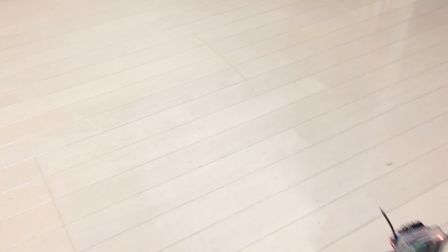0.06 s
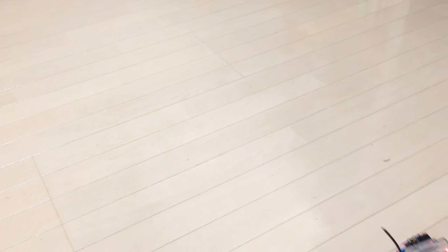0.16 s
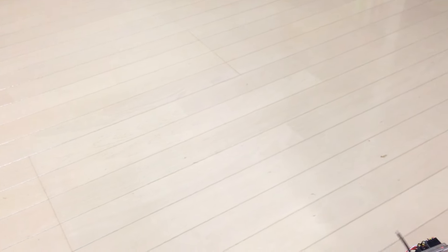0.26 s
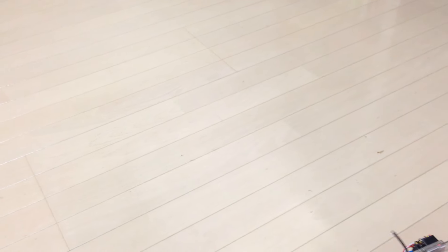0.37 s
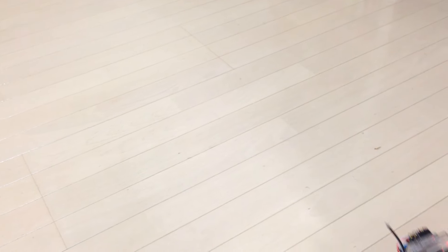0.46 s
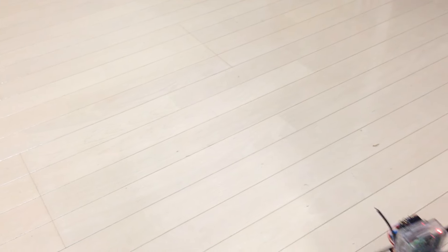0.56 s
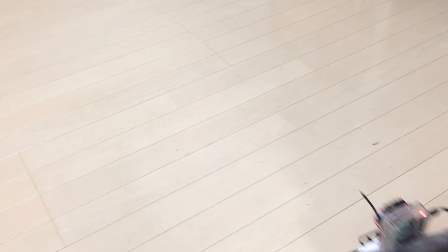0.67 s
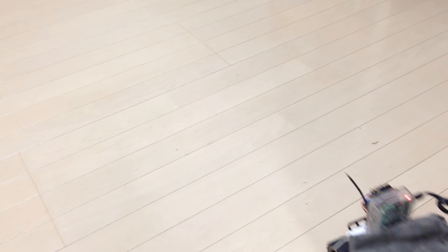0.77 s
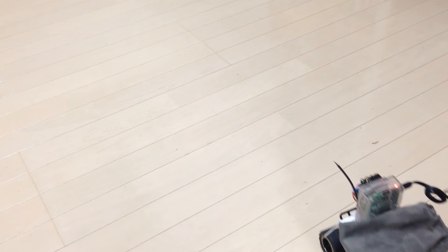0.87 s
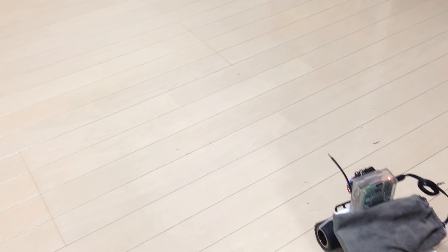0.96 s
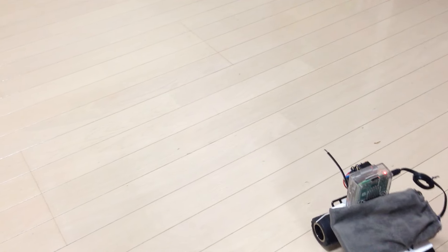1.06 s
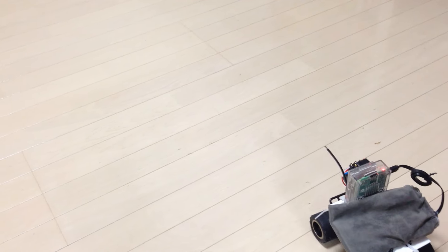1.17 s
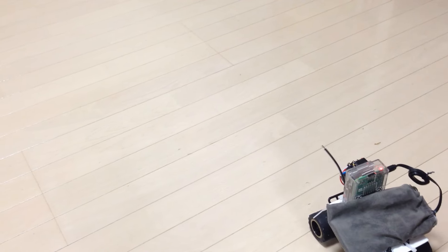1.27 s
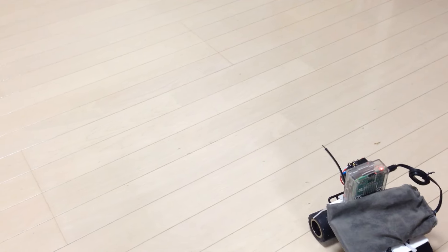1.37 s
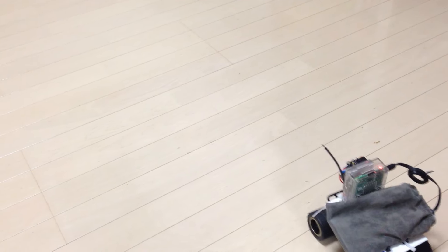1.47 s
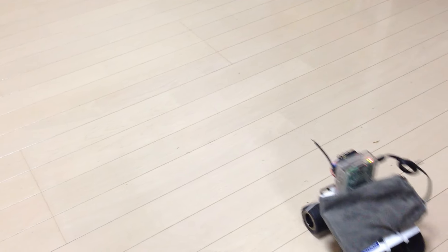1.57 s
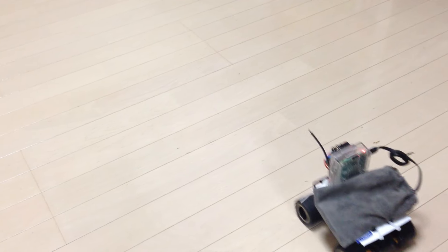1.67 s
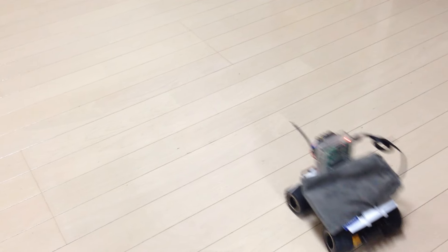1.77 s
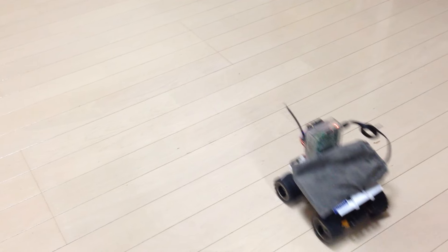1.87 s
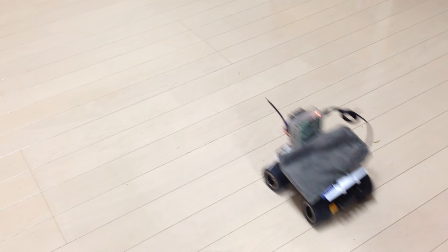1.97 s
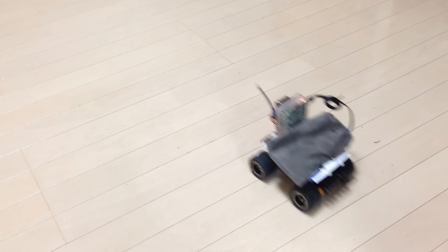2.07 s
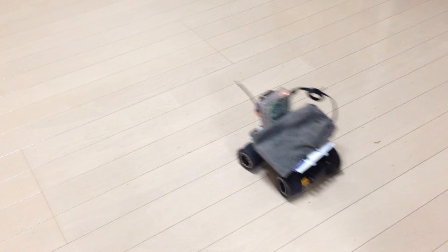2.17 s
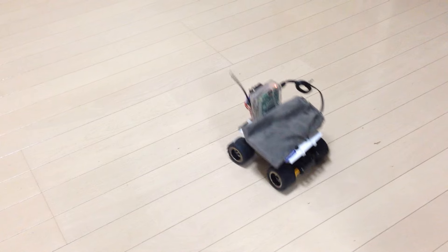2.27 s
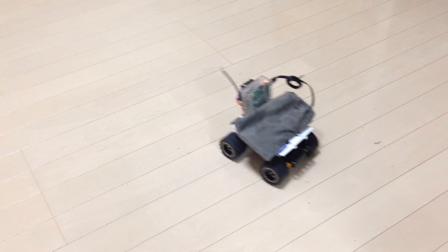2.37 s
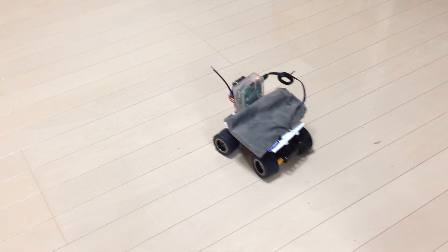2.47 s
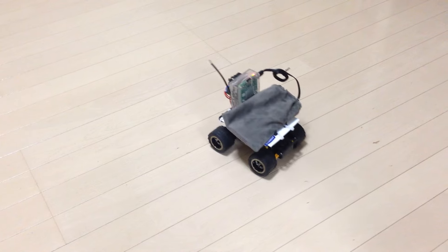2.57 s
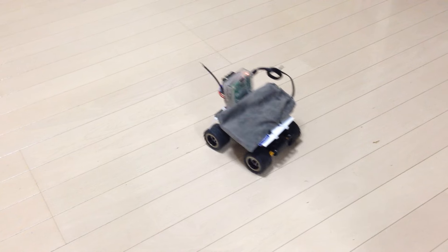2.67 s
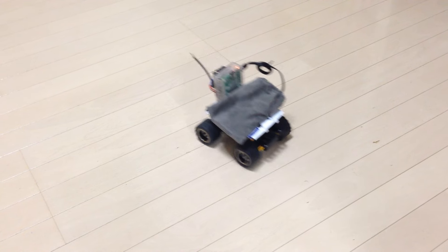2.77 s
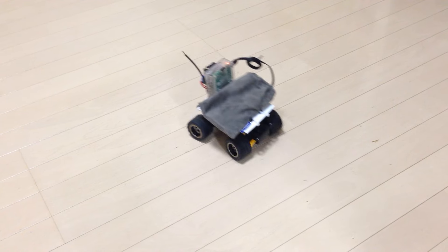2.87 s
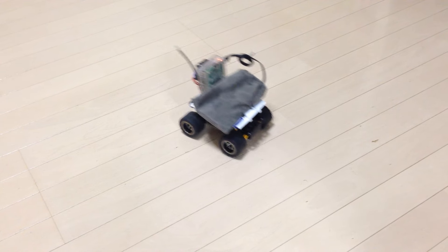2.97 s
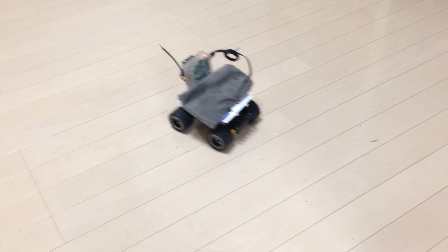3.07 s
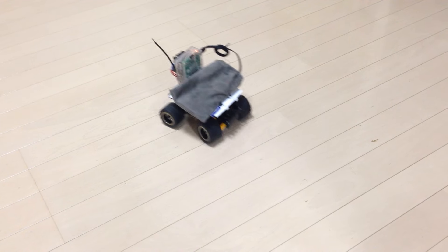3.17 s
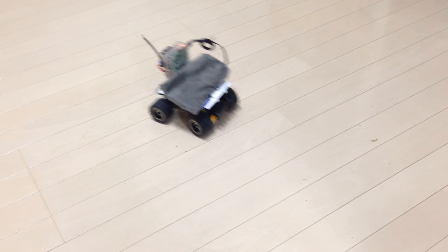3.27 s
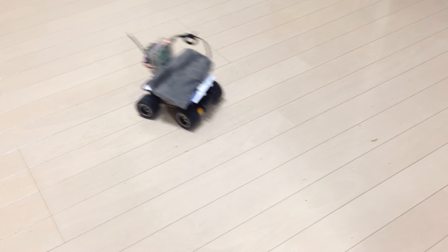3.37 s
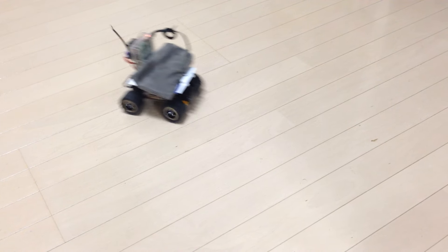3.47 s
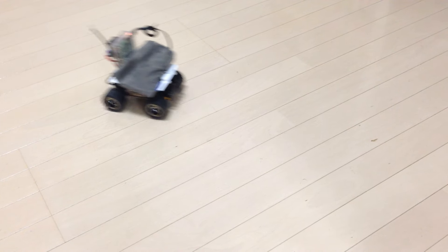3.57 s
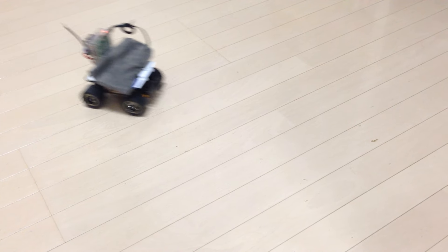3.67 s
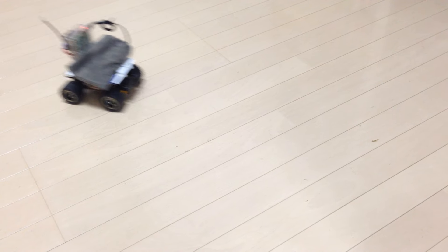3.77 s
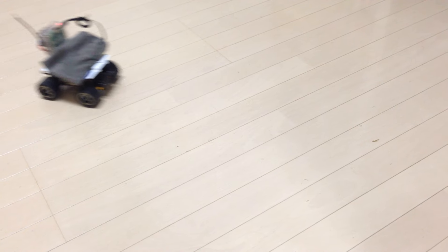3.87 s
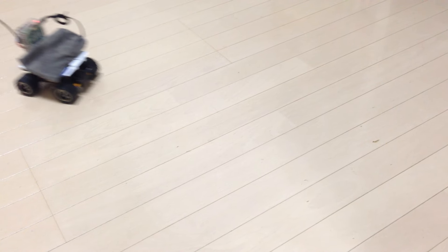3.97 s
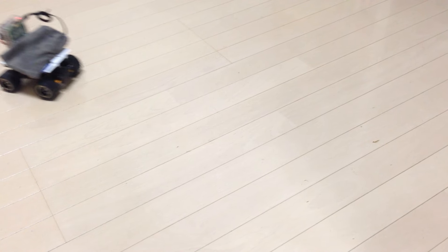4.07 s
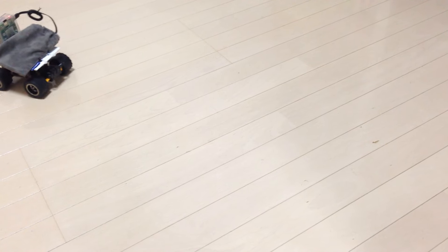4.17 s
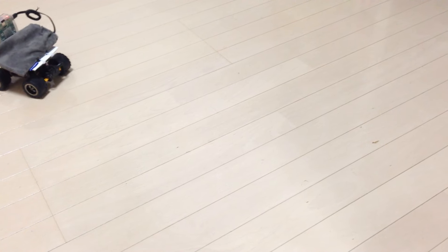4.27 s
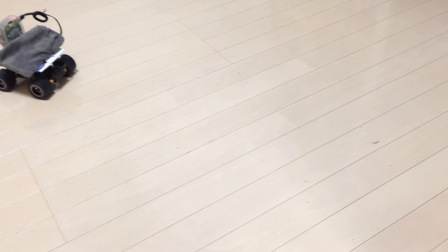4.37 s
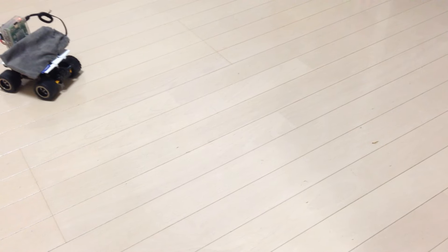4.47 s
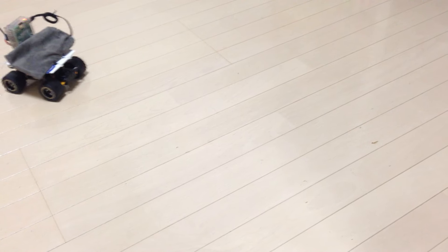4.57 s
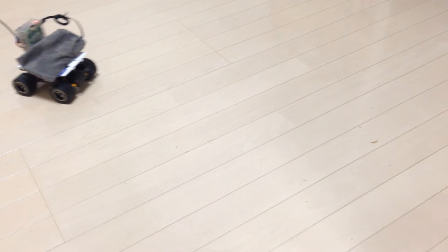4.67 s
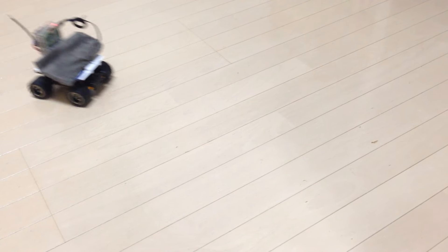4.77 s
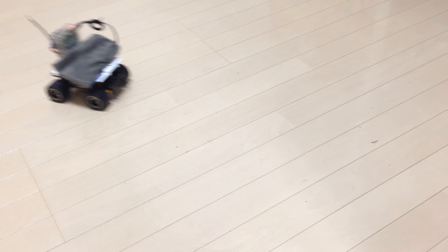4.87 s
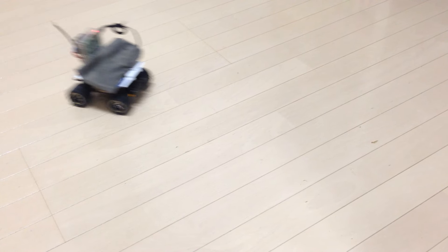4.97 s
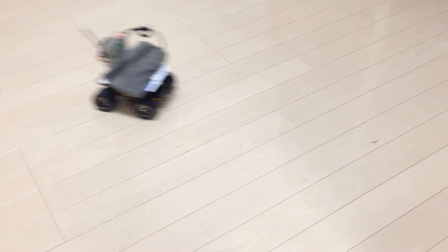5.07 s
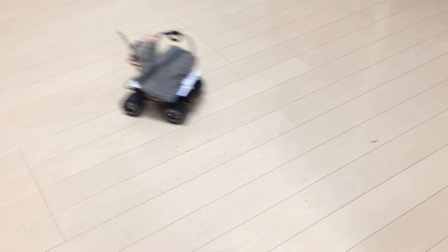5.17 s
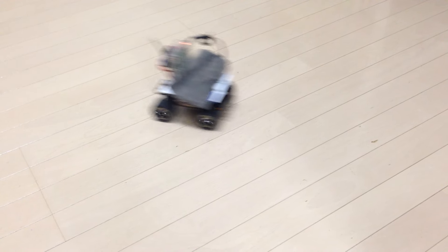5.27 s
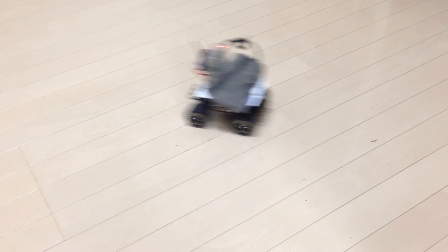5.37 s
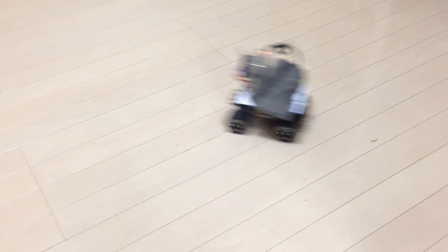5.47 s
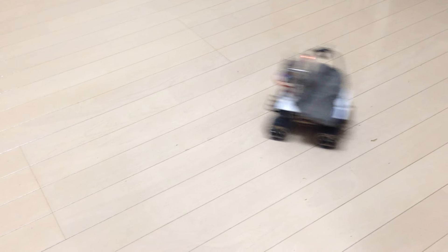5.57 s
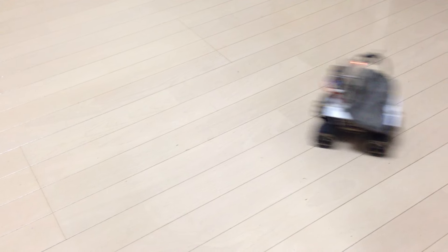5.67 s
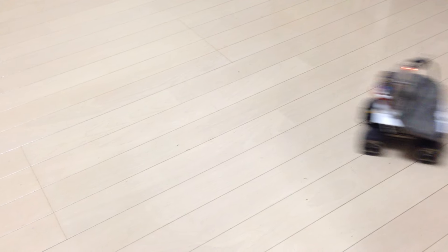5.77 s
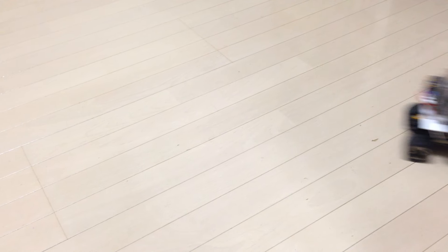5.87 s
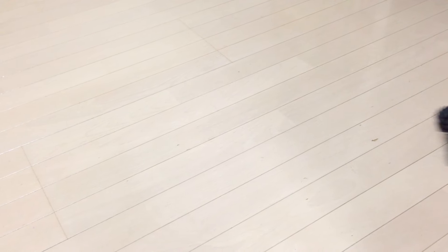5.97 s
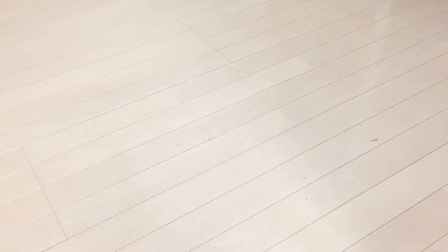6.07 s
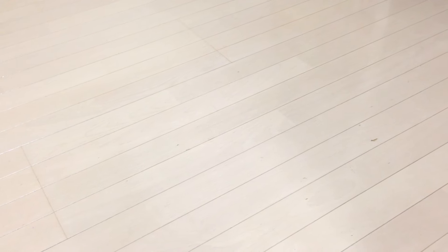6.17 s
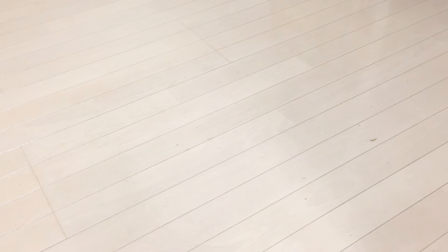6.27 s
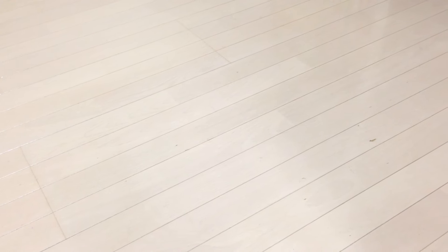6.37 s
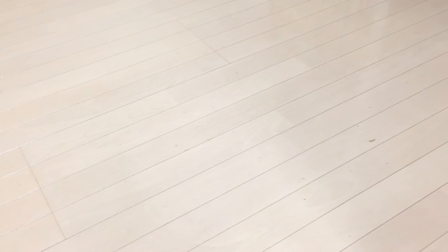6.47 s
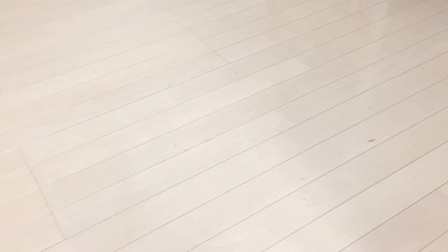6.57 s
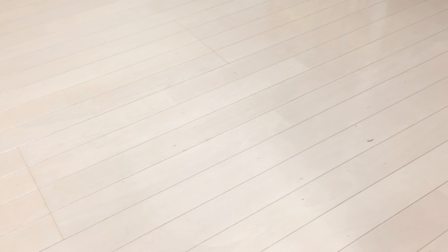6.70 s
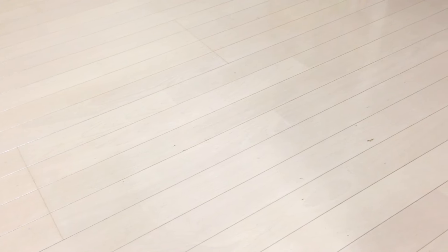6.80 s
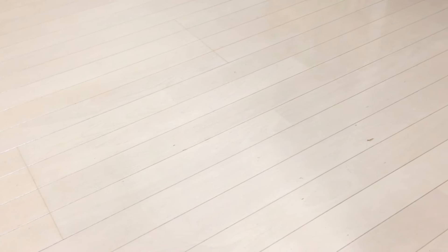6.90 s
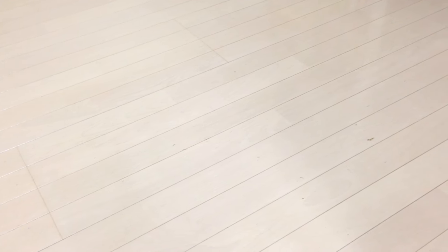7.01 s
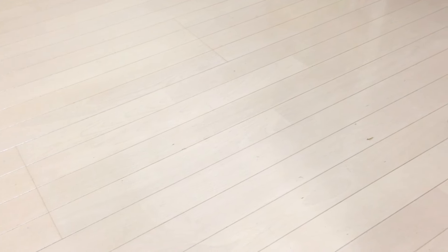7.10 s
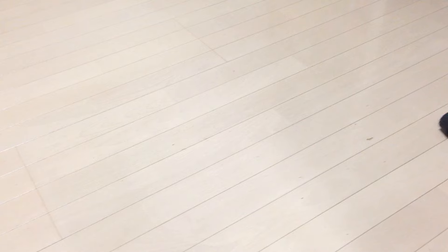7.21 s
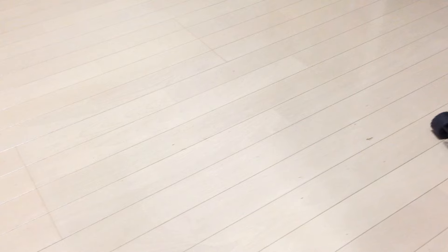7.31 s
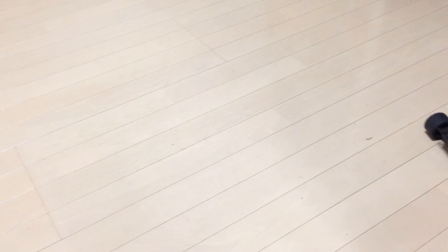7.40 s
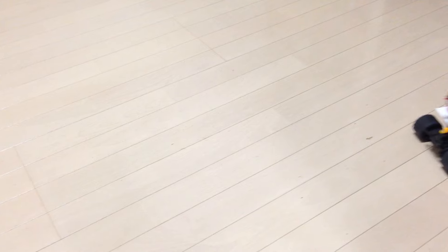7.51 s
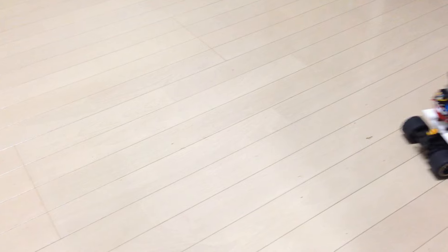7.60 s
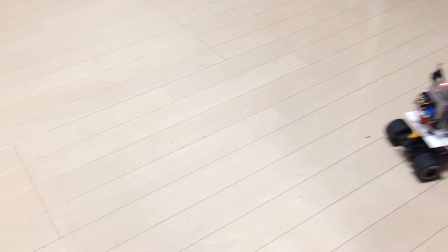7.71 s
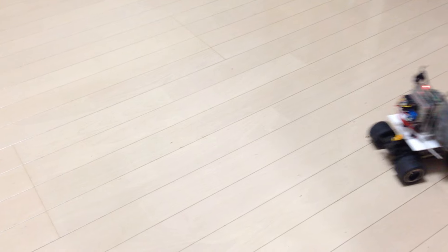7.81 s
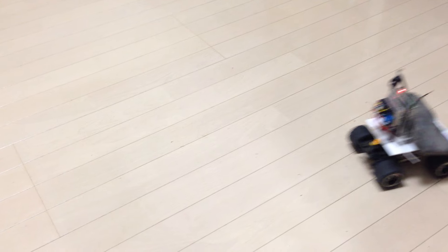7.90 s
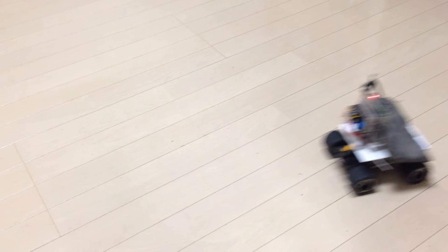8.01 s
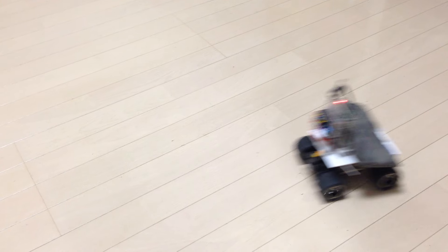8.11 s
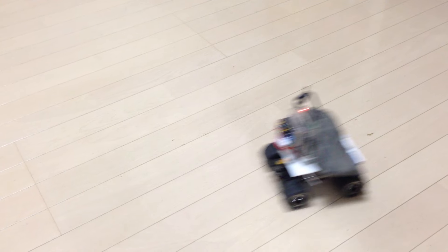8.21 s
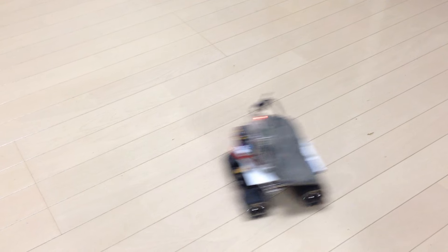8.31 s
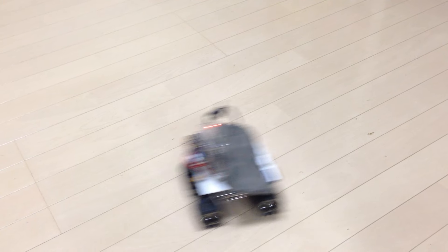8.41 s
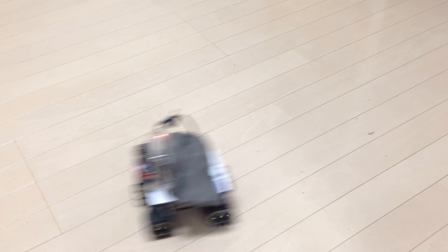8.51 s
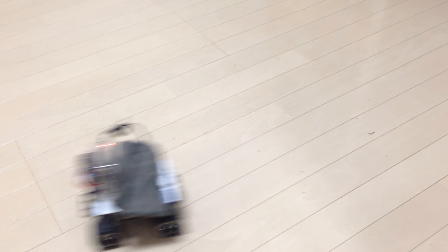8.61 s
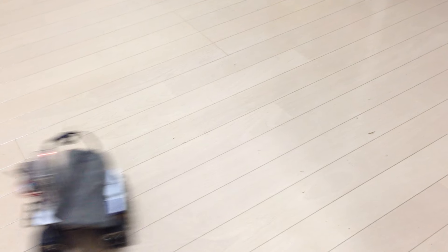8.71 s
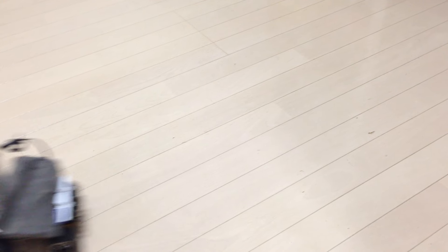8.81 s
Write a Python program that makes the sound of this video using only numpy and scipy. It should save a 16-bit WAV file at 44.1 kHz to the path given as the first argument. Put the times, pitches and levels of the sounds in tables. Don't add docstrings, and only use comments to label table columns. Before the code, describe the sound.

Stop-and-go plastic gear whirr, tyre drumming and dry clicks from a little motorised car on floorboards, close up in a quiet room.

```python
import sys
import numpy as np
from scipy import signal
from scipy.fft import rfft, irfft, next_fast_len
from scipy.io import wavfile
from scipy.ndimage import uniform_filter1d

SR = 44100
rng = np.random.default_rng(int(sys.argv[2]) if len(sys.argv) > 2 else 0)


def how_loud(loudness_db):
    steps = np.asarray(loudness_db, float) / 20
    return 10 ** steps


def inscribe(sig):
    pcm = np.round(np.clip(np.atleast_2d(sig).T, -1, 1) * 32767)
    wavfile.write(sys.argv[1], SR, pcm.astype(np.int16))


N = 390285

# [frame/dB, gearbox/dB, shell/dB, brushes/dB, loose board/dB]
GAIT_BALANCE = [
    (-3, -1.5, -0.5, -3, 1.5),
    (-3, -4, -5.5, -9, 3),
    (-10, -7.5, -4.5, -9.5, 2.5),
    (-10.5, -8, -5.5, -9, -1),
]


def evened(x):
    return x / np.sqrt(np.mean(x ** 2) + 1e-20)


def curves(rows):
    s, *columns = np.transpose(rows)
    return [np.interp(np.arange(N) / SR, s, c) for c in columns]


def add(mix, s, sound):
    part = mix[max(round(s * SR), 0):][:len(sound)]
    part += sound[:len(part)]


def summed(db):
    return 10 * np.log10((how_loud(db) ** 2).sum(0))


def drift(per_s):
    knots = np.arange(0, N / SR + .1, .2 / per_s)
    smooth = uniform_filter1d(rng.standard_normal(len(knots)), size=5)
    smooth = uniform_filter1d(smooth, size=5)
    return np.interp(np.arange(N) / SR, knots, evened(smooth))


def coloured(x, points):
    f, db = np.transpose(points)
    size = next_fast_len(N)
    hz = np.fft.rfftfreq(size, 1 / SR)
    gain = how_loud(np.interp(np.log(hz + 1), np.log(f + 1), db))
    return evened(irfft(rfft(x, size) * gain, size)[:N])


def still_air():
    # [f/Hz, level/dB per Hz]
    air_spectrum = [(18, -32), (48, -6.5), (72, 0), (130, -8.5), (225, -16), (292, -6.5), (341, -16),
                    (443, -13), (945, -24.5), (2300, -23), (2750, -23.5), (3400, -21), (5000, -25),
                    (14300, -27), (15500, -23.5)]
    return how_loud(-60) * coloured(rng.standard_normal(N), air_spectrum)


def room(x):
    t60_s, level_db, spacing = 0.22, -6.5, 22
    at = np.arange(200, SR // 2, spacing)
    sign = rng.choice([-1., 1.], len(at))
    tail = np.zeros(SR)
    tail[at + rng.integers(0, spacing, len(at))] = sign * how_loud(-60 * at / SR / t60_s)
    return how_loud(level_db) * signal.fftconvolve(x, tail / np.linalg.norm(tail))[:N]


def knock():
    # [f/Hz, level/dB, t60/s]
    struck_modes = [
        (103, 1.5, 0.056),
        (188, 3, 0.065),
        (250, -29, 0.1),
        (490, -10, 0.032),
        (1133, -15, 0.057),
    ]
    out, t = np.zeros(N), np.arange(9000) / SR
    ringing = sum(how_loud(db - 60 * t / t60) * np.sin(2 * np.pi * hz * t) for hz, db, t60 in struck_modes)
    add(out, .1725, how_loud(-28.5) * ringing * (1 - np.exp(-t / 0.0012)))
    return out


def ticks():
    # [t/s, peak level/dB, centre f/Hz]
    grit_cracks = [(.1072, -47, 6800), (0.1253, -37, 5000), (1.5818, -47, 4200), (1.7843, -43, 5500),
                   (3.0664, -44, 5840), (3.5518, -43, 6300), (3.8315, -44, 5903), (4.2102, -47, 5550),
                   (4.6448, -45, 5800), (4.9646, -44, 5595), (5.1567, -43, 6297), (5.4385, -44, 5940),
                   (5.462, -39, 9000), (5.7887, -34, 7500), (5.954, -38, 7470), (6.0573, -43, 8500),
                   (6.3324, -42, 6000), (6.3659, -43, 9000), (7.7083, -44, 5600), (8.0716, -44, 8400),
                   (8.0805, -43, 5830), (8.1621, -36, 5700), (8.3105, -40, 8606), (8.4532, -32, 8070),
                   (8.5235, -39, 7200), (6.923, -50, 1200), (6.94, -45, 1610), (6.956, -43, 1300),
                   (6.97, -48, 2000), (1.999, -48, 3500)]
    out, t = np.zeros(N), np.arange(900) / SR
    puffs = rng.standard_normal((len(grit_cracks), 900))
    for (s, db, hz), puff in zip(grit_cracks, puffs):
        band = signal.butter(2, hz * np.array([0.62, 1.38]), "band", fs=SR, output="sos")
        add(out, s, how_loud(db - 7.5 - 60 * t / 0.013) * evened(signal.sosfilt(band, puff)))
    return out


def snaps():
    # [t/s, peak level/dB, f/Hz]
    plastic_snaps = [(.1262, -38, 4300), (.1517, -34, 4300), (0.152, -32, 7600), (.1605, -36, 6500),
                     (.166, -30, 7200), (0.365, -48, 6000), (1.583, -45, 5200), (3.027, -47, 1300),
                     (3.19, -45, 6030), (3.555, -47, 7000), (4.373, -46, 1101), (4.656, -42, 1300),
                     (4.797, -46, 1500), (5.128, -43, 1200), (5.472, -37, 4500), (5.659, -38, 4000),
                     (5.687, -42, 8600), (8.622, -40, 4000)]
    out, t = np.zeros(N), np.arange(600) / SR
    for s, db, hz in plastic_snaps:
        decay = how_loud(db - 60 * t * hz / 12)
        add(out, s, decay * np.sin(2 * np.pi * hz * t))
    return out


def clicks():
    # [t/s, peak level/dB, f/Hz, bright tick level/dB]
    backlash = [(0.1253, -30, 3170, -54), (0.151, -24.5, 3130, -35.5), (0.3636, -52, 3500, -48),
                (1.1102, -42, 3660, -61), (1.292, -37, 4700, -51), (1.582, -36, 3640, -48),
                (1.787, -39, 3450, -50), (2.442, -48, 4800, -50), (4.435, -57, 4800, -53),
                (1.9939, -35, 3570, -62), (2.233, -32, 3640, -41.5), (2.498, -31, 4810, -40.5),
                (2.8697, -36, 4780, -42.5), (3.026, -54, 3670, -46), (3.1876, -43, 3650, -44.5),
                (3.6311, -38, 3800, -44.5), (3.8376, -34, 3025, -52), (4.6566, -55, 3260, -54),
                (4.7912, -40, 3387, -48), (5.124, -49, 3640, -44), (5.4698, -25, 4006, -42),
                (5.6581, -25, 4064, -44), (8.0185, -37, 3240, -42), (8.289, -32, 3180, -43),
                (8.4448, -26.5, 8080, -38), (8.6204, -45, 4070, -32), (8.744, -46, 3888, -41)]
    out, t = np.zeros(N), np.arange(4000) / SR
    bright = signal.butter(2, [4000, 14000], "band", fs=SR, output="sos")
    rattle = signal.sosfilt(bright, rng.standard_normal((len(backlash), 4000)))
    for (s, db, hz, tick_db), puff in zip(backlash, rattle):
        ring = how_loud(db - 12 - 60 * t / 0.022) * np.sin(2 * np.pi * hz * t)
        tick = how_loud(tick_db) * puff * (how_loud(-60 * t / 0.0064) + 0.33 * how_loud(-60 * t / 0.19))
        onset = 1 - np.exp(-t / 0.00053)
        add(out, s, onset * (ring + tick))
    return out


def rings():
    # [centre t/s, f/Hz, length/s, level/dB]
    loose_parts = [(0.158, 1125, 0.032, -53), (.172, 1190, .012, -46), (.388, 2980, .01, -54),
                   (.41, 2300, 0.031, -59), (.395, 1092, 0.029, -59), (5.6, 4200, 0.018, -55),
                   (5.6, 3260, .02, -57), (5.41, 2450, .015, -51), (6.15, 3900, .04, -63),
                   (6.03, 4000, .04, -58), (3.167, 2367, 0.022, -59), (3.338, 1764, 0.038, -55),
                   (3.718, 1463, 0.026, -56), (3.728, 3770, 0.032, -55), (3.84, 1003, 0.035, -55),
                   (3.905, 2210, 0.065, -57), (5.059, 2215, 0.028, -55), (5.131, 1098, 0.012, -51),
                   (5.322, 1168, 0.019, -50), (5.327, 3244, 0.016, -56), (5.383, 1750, 0.021, -47.5),
                   (5.519, 2385, 0.048, -50), (5.553, 3185, 0.019, -43.5), (5.666, 1296, 0.028, -51.5),
                   (5.728, 1165, 0.025, -49), (5.752, 2280, 0.022, -44.5), (5.928, 1880, 0.031, -49),
                   (7.73, 5600, 0.042, -56.5), (6.198, 1935, 0.064, -53.5), (8.17, 1054, 0.04, -55.5),
                   (8.323, 3770, 0.037, -47.5), (8.38, 5600, 0.04, -58), (8.472, 5845, 0.031, -50),
                   (8.475, 3230, 0.044, -50), (8.5, 2004, 0.026, -50.5), (8.67, 2310, 0.029, -39.5),
                   (8.694, 1050, 0.037, -53)]
    # [centre t/s, f/Hz, length/s, level/dB]
    board_hums = [(0.751, 69, 0.092, -45), (1.645, 114.6, 0.1, -39.5), (2.771, 63, 0.05, -46),
                  (3.11, 210, 0.039, -52.5), (4.215, 95.4, .05, -49), (4.662, 200, 0.031, -54),
                  (4.83, 176.5, 0.084, -51), (5.33, 95.06, 0.036, -43), (5.505, 97.8, .05, -40),
                  (5.831, 187.5, 0.049, -44.5), (5.683, 257.5, 0.065, -47.5), (6.349, 273.5, 0.053, -52),
                  (4.21, 52, .08, -55), (4.407, 68.5, .04, -55), (5.403, 55, 0.096, -54),
                  (1.0, 171, 0.032, -57), (5.46, 244, 0.046, -53), (4.669, 253, 0.029, -61),
                  (5.051, 222, 0.039, -55), (7.796, 70, 0.037, -36.5), (8.046, 103, .04, -41.5),
                  (8.729, 279.4, 0.087, -50.5)]
    # [centre t/s, f/Hz, length/s, level/dB]
    more_loose_parts = [(0.13, 4280, 0.0062, -53), (0.155, 4360, 0.0073, -47), (0.16, 2440, 0.026, -57),
                        (.06, 4150, 0.036, -61), (0.678, 3580, 0.018, -67), (.745, 2330, .02, -57),
                        (.71, 1510, 0.064, -61), (7.739, 2190, .05, -61), (1.12, 3640, 0.032, -62),
                        (1.544, 1014, 0.023, -62), (1.633, 1084, 0.039, -59), (1.773, 1017, 0.018, -58.5),
                        (2.023, 1264, 0.036, -59), (2.736, 1000, 0.015, -64), (5.47, 4290, .012, -46),
                        (5.481, 1510, 0.023, -50.5), (2.264, 3700, 0.029, -56), (2.499, 3996, 0.017, -53),
                        (2.531, 2380, 0.046, -60), (3.034, 1194, 0.013, -53.5), (3.666, 3560, 0.028, -50.5),
                        (5.136, 1260, 0.024, -51.5), (5.14, 3617, 0.031, -55), (5.39, 4260, 0.034, -49),
                        (5.488, 2610, 0.02, -48), (5.521, 4230, .03, -52), (5.7, 4230, 0.031, -51),
                        (5.734, 3990, 0.032, -48), (6.33, 1057, .05, -55.5), (6.364, 1240, 0.045, -58),
                        (6.941, 1750, 0.02, -51), (6.927, 980, 0.03, -54.5), (8.024, 1880, .03, -54),
                        (8.036, 3310, 0.021, -52), (8.185, 2046, 0.044, -53), (8.216, 1560, 0.055, -53),
                        (8.258, 1880, .03, -55), (8.188, 4100, 0.031, -55), (8.373, 1774, .04, -52),
                        (8.464, 3520, 0.031, -50), (8.468, 5325, .04, -57), (8.552, 1970, 0.04, -55),
                        (8.595, 2153, .025, -55), (8.641, 8434, 0.026, -46), (8.643, 3660, 0.023, -54),
                        (8.704, 2180, 0.039, -53), (8.707, 5450, 0.039, -53)]
    # [centre t/s, f/Hz, length/s, level/dB]
    wheel_thuds = [(0.12, 158, .03, -42), (0.19, 201, .03, -39.5), (0.29, 205, 0.0302, -49.5),
                   (1.692, 165, 0.045, -56), (1.802, 170, 0.038, -51), (1.7, 160, 0.036, -51),
                   (3.082, 172, 0.0324, -66), (4.391, 148, .04, -54), (5.665, 185.4, .03, -51),
                   (5.6, 192, 0.0359, -46), (5.7, 200, 0.0285, -53), (6.33, 203, 0.034, -46),
                   (7.8, 380, 0.06, -60), (7.5, 350, 0.038, -60), (6.914, 175.8, 0.042, -50),
                   (7.58, 169, 0.0456, -51), (7.77, 160, 0.0545, -47.5), (8.731, 187, .03, -47.5),
                   (1.662, 560, .04, -66), (2.76, 530, 0.03, -63), (.395, 420, .03, -57),
                   (.25, 330, .04, -62), (9.4, 130, .05, -45), (7, 101, 0.0424, -54),
                   (7.6, 100, 0.0598, -47), (1.7, 120, 0.041, -48), (1.56, 76, .04, -45),
                   (1.62, 148, .08, -51), (.185, 130, .02, -38), (1.83, 118, .08, -50),
                   (7.76, 141, .04, -50), (4.83, 750, .04, -61), (4.66, 650, 0.037, -65)]
    out, waver = np.zeros(N), drift(220)
    for s, hz, length, db in loose_parts + board_hums + more_loose_parts + wheel_thuds:
        t = np.arange(round(1.6 * length * SR)) / SR
        start = round(s * SR / 2)
        pitch_waver = waver[start:][:len(t)]
        level_waver = waver[::-1][start:][:len(t)]
        turns = np.cumsum(hz * (1 + 0.0245 * pitch_waver)) / SR
        rough_db = 3.0 * (hz > 800) * level_waver
        swell = how_loud(db + rough_db) * np.hanning(len(t))
        add(out, s - t[-1] / 2, swell * np.sin(2 * np.pi * turns))
    return out


def bouts(column, shapes):
    # [start t/s, power on/s, motor effort level/dB, lug drumming level/dB, board rumble level/dB]
    launches = [(.643, 0.11, -63, -51, -61.5), (1.565, 0.1, -60.5, -42, -56), (1.759, 0.1, -61.5, -51, -63),
                (2.73, 0.089, -62.5, -51, -59), (3.022, 0.068, -57, -42, -58),
                (3.637, .12, -57, -45, -60.5), (4.366, 0.014, -59.5, -67, -60),
                (4.649, 0.023, -58.5, -70, -59.5)]
    heaves = [(0.111, 0.059, -50, -46.5, -46), (0.343, 0.044, -60.5, -52, -52.5),
              (6.11, 0.063, -54, -53.5, -47.5), (6.286, 0.073, -54.5, -51.5, -50),
              (6.85, 0.1, -57, -38.5, -56.5), (7.098, 0.091, -57.5, -43, -56),
              (7.475, 0.096, -56, -48, -52), (7.685, 0.076, -54.5, -43.5, -52.5)]
    creeps = [(.025, 0.061, -53.5, -49.5, -59), (1.095, 0.035, -61.5, -74, -71.5),
              (1.285, 0.048, -59.5, -64, -70), (1.45, 0.025, -69, -66, -78),
              (1.983, 0.1, -53.5, -49.5, -63), (2.227, 0.043, -54.5, -60, -62.5),
              (2.49, 0.021, -57, -64, -64), (2.863, 0.047, -57.5, -75, -63.5),
              (3.185, 0.13, -59.5, -55, -71), (3.3, 0.094, -58.5, -49, -64), (3.422, 0.13, -54, -59, -65.5),
              (3.828, 0.05, -48, -60, -56), (3.95, 0.033, -53, -59, -60.5), (4.09, 0.046, -54, -69, -60.5),
              (4.2, .03, -56, -75, -66),
              (-.06, 0.041, -51.5, -42.5, -60.5), (.275, 0.064, -85, -49.5, -60), (.5, .03, -68, -74, -73),
               (1.528, 0.03, -63, -69, -60), (1.9, 0.034, -57.5, -66, -58.5), (2.38, 0.14, -61.5, -76, -73),
               (2.62, 0.1, -84, -90, -88), (5.04, 0.061, -55, -61, -60), (6.031, 0.067, -65, -63, -62),
               (6.255, 0.022, -62, -40.5, -59), (6.45, 0.035, -68, -49, -84), (7.399, 0.019, -69, -75, -77)]
    dashes = [(4.789, 0.021, -50.5, -68, -57.5), (4.955, 0.052, -51, -75, -62),
              (5.115, 0.077, -47.5, -64, -59), (5.3, 0.066, -47, -58.5, -58.5),
              (5.453, 0.073, -45.5, -49.5, -56.5), (5.649, 0.07, -43, -51, -52),
              (5.8, 0.035, -55, -50, -58), (5.93, 0.078, -53, -51.5, -56),
              (7.872, 0.077, -49.5, -50.5, -54.5), (8.018, 0.066, -48, -49.5, -57),
              (8.159, 0.042, -48.5, -62, -59.5), (8.299, 0.07, -46, -44.5, -56),
              (8.449, 0.081, -45.5, -44, -55), (8.616, 0.058, -45.5, -50, -51),
              (8.74, 0.043, -60, -52, -65)]
    t, levels = np.arange(0, N / SR + .01, .001), []
    for rows, (lag, attack, climb_db, coast_db) in zip((launches, heaves, creeps, dashes), shapes):
        rows = np.array(rows)
        since, on = t - rows[:, :1] - lag, rows[:, 1:2]
        climb = climb_db * np.clip(.5 - since / on, -.5, .5)
        coast = coast_db * np.maximum(since - on, 0)
        db = rows[:, column, None] - climb - coast
        bout_power = (np.clip(since / attack, 0, 1) * how_loud(db)) ** 2
        levels.append(np.interp(np.arange(N) / SR, t, bout_power.sum(0)) + 1e-11)
    return 10 * np.log10(levels)


def body(x, modes, patchy_db, per_s, wander=0):
    out, n = np.zeros(N), np.arange(N)
    for k, (hz, width, db) in enumerate(modes):
        b, a = signal.iirpeak(hz, hz / (1.4 * width), SR)
        ring = signal.lfilter(b, a, signal.lfilter(b, a, x))
        contact = drift(per_s)
        if wander:
            delay = np.cumsum(wander * (contact - contact.mean()))[::-1]
            ring = np.interp(n + delay, n, ring)
        out += (-1) ** k * how_loud(db + patchy_db * contact) * evened(ring)
    return evened(out)


def tyres():
    # [t/s, lug rate f/Hz]
    lug_rate = [(0.0, 70.1), (.75, 67.76), (1.3, 78.2), (1.62, 58.34), (2.1, 75), (2.8, 63.63),
                (3.07, 93.4), (3.22, 66.5), (4.0, 68.8), (4.4, 104.2), (5.3, 93.1), (5.88, 97.2),
                (6.2, 74.8), (6.9, 69.7), (7.9, 68.7), (8.3, 77.5), (8.53, 88.7), (8.85, 88.3)]
    # [lag/s, attack/s, climb under power/dB, coasting fall/dB per s]
    drum_shape = [
        (0.0025, 0.026, 3.1, 120),
        (0.022, 0.015, 1, 150),
        (0.0084, 0.021, 1.7, 150),
        (0.012, 0.028, 2.9, 60),
    ]
    # [lag/s, attack/s, climb under power/dB, coasting fall/dB per s]
    rumble_shape = [
        (.008, .02, 1, 139),
        (.008, .02, 4, 186),
        (.01, .02, 1.5, 60),
        (.01, .02, 1.3, 50.3),
    ]
    # [f/Hz, width/Hz, level/dB]
    board_modes = [(143.8, 23.4, -2), (190.6, 42, -1.5), (229.8, 28.5, -5), (279.6, 64, -9.5),
                   (385, 87, -12), (563, 700, -17)]
    # [f/Hz, width/Hz, level/dB]
    loose_modes = [(64.3, 42, -1), (107, 16.6, 0)]
    hz = curves(lug_rate)[0]
    drum_db, rumble_db = bouts(column=3, shapes=drum_shape), bouts(column=4, shapes=rumble_shape)
    loose_db = summed(0.45 * drum_db + 0.55 * rumble_db + np.array(GAIT_BALANCE)[:, -1:])
    turns = np.cumsum(hz * (1 + .05 * drift(70))) / SR
    drum = np.sqrt(2) * np.sin(2 * np.pi * turns) * how_loud(2.5 * drift(60))
    lug_lands = np.diff(np.floor(turns), prepend=0) > 0
    blows = lug_lands * how_loud(1.5 * rng.standard_normal(N))
    drive = evened(blows) + 1.62 * rng.standard_normal(N)
    loose = how_loud(loose_db) * body(drive, loose_modes, 0, 30)
    rumble = how_loud(summed(rumble_db)) * body(drive, board_modes, 2.3, 25.24)
    return how_loud(summed(drum_db) - 4.5) * drum + loose + rumble


def teeth(per_s, spread_db):
    size = how_loud(spread_db * np.minimum(rng.exponential(1, N), 4))
    return size * np.sign(rng.standard_normal(N)) * (rng.random(N) < per_s / SR)


def gears():
    # [lag/s, attack/s, climb under power/dB, coasting fall/dB per s]
    strain_shape = [
        (0.00081, 0.014, 0.5, 86),
        (0.00084, 0.015, 8, 183),
        (0.0014, 0.011, 1.5, 84),
        (0.00076, 0.011, 0.5, 53.5),
    ]
    # [lag/s, attack/s, climb under power/dB, coasting fall/dB per s]
    motor_shape = [
        (.001, 0.011, -1, 79),
        (.001, .02, 5, 158),
        (.001, 0.0083, -3, 72),
        (.001, 0.013, -0.5, 45.5),
    ]
    # [t/s, tilt from frame to brushes/dB]
    facing = [(0.0, 2), (.43, -8.5), (1.2, 2.5), (1.7, -2), (2.4, 1), (2.75, -3.5), (3.2, -2), (4.3, 2),
              (4.9, -3), (5.2, -2), (5.8, 5), (6.2, -2), (6.95, 0), (7.6, -1), (8.0, -2), (8.62, 6),
              (8.85, 0.5)]
    facing_share = (-0.48, -0.3, -0.16, 0.55)
    # [f/Hz, width/Hz, level/dB]
    frame_modes = [(578, 320, -6), (818, 210, -8), (972, 130, -5), (1092, 69, -4), (1267, 167, -1.5),
                   (1463, 83, -4)]
    # [f/Hz, width/Hz, level/dB]
    box_modes = [(1598, 79, -8.5), (1750, 69, -7.5), (1880, 56, -6), (2010, 60, -6), (2183, 93, -5.5),
                 (2338, 24, -7), (2460, 420, -2)]
    # [f/Hz, width/Hz, level/dB]
    shell_modes = [(2895, 440, -4.5), (3213, 140, -5), (3400, 140, -7.5), (3560, 13.5, -6.5),
                   (3775, 180, -4), (4070, 104, -5.5), (4340, 310, -7.5), (4800, 920, -5.5)]
    # [f/Hz, width/Hz, level/dB]
    brush_modes = [(5250, 150, -10), (5670, 450, -2), (6760, 1170, -1.5), (7830, 1000, -2),
                   (8530, 780, -0.5), (9680, 1550, -3), (11700, 1500, -5.5), (13600, 1900, -4)]
    # [f/Hz, width/Hz, depth 0-1]
    dead_spot = (2720, 180, 0.48)
    strain_db, effort_db = bouts(column=2, shapes=strain_shape), bouts(column=2, shapes=motor_shape)
    shudder_db, facing_db = drift(350), curves(facing)[0]
    drives = (strain_db, strain_db, effort_db, effort_db)
    frame_db, box_db, shell_db, brush_db = (
        summed(drive_db + share[:, None]) + tilt * facing_db + shudder_db
        for drive_db, share, tilt in zip(drives, np.transpose(GAIT_BALANCE), facing_share))
    frame = how_loud(frame_db) * body(teeth(1500, 3.0), frame_modes, 2.6, 30, wander=.025)
    box = how_loud(box_db) * body(teeth(2500, 3.0), box_modes, 2.8, 30, wander=.015)
    shell = how_loud(shell_db) * body(teeth(3500, 3.0), shell_modes, 2.8, 34, wander=.012)
    brushes = how_loud(brush_db + 2.0 * drift(120)) * body(teeth(7000, 3.0), brush_modes, 1.8, 30)
    parts = frame + box + shell + brushes
    hz, width, depth = dead_spot
    b, a = signal.iirpeak(hz, hz / width, SR)
    return how_loud(-0.71) * (parts - depth * signal.lfilter(b, a, parts))


def scene():
    sharp = knock() + ticks() + snaps() + clicks() + rings()
    car = tyres() + gears()
    return (still_air() + room(sharp) + sharp + car)[None]


def band_limit(x):
    return signal.sosfilt(signal.butter(12, 15340, fs=SR, output="sos"), x)


def record(dry):
    x = signal.sosfilt(signal.butter(4, 46, "high", fs=SR, output="sos"), dry)
    top_cut = signal.firwin(301, 15300, window=("kaiser", 6), fs=SR)
    x = signal.oaconvolve(x, top_cut[None], "same")
    return band_limit(x)


dry = scene()
out = record(dry)
inscribe(out)
```